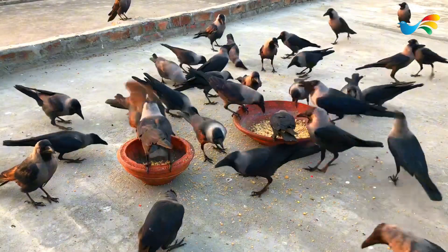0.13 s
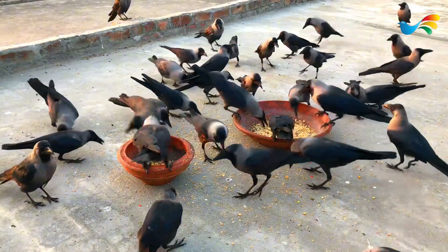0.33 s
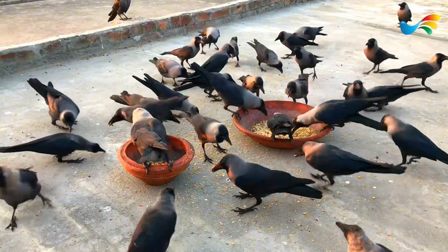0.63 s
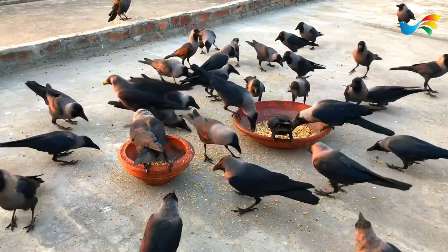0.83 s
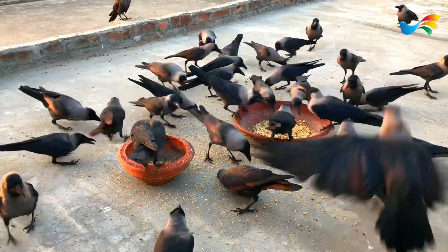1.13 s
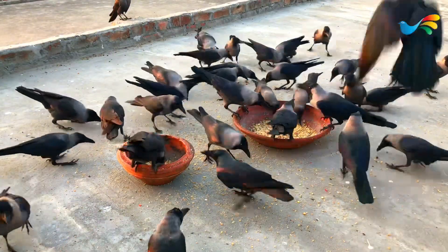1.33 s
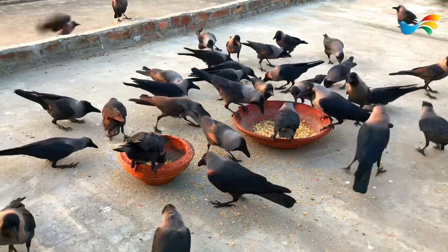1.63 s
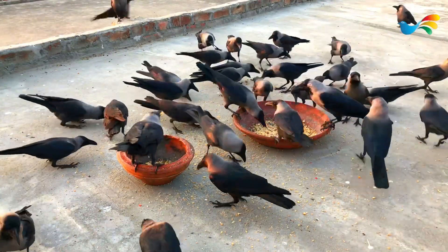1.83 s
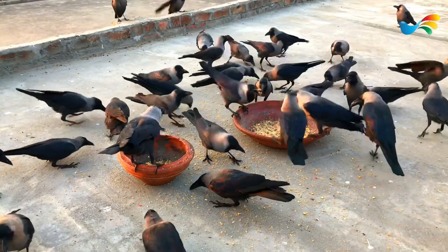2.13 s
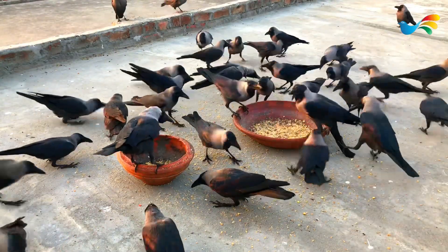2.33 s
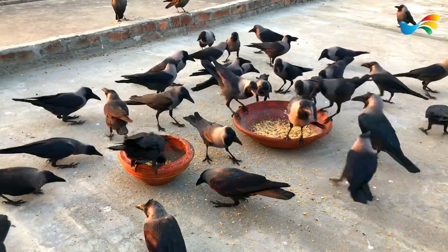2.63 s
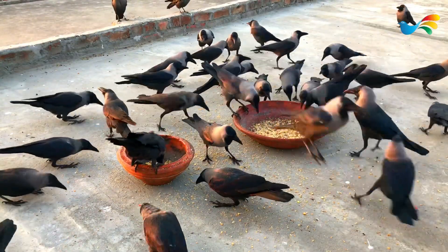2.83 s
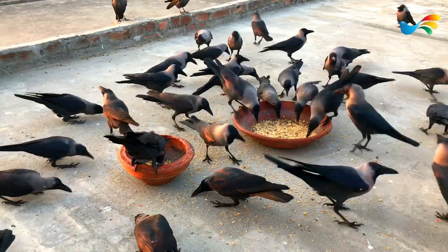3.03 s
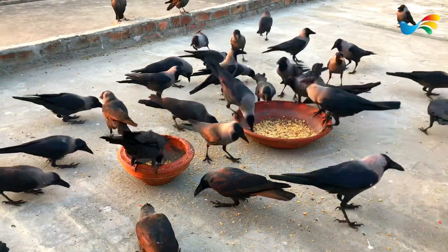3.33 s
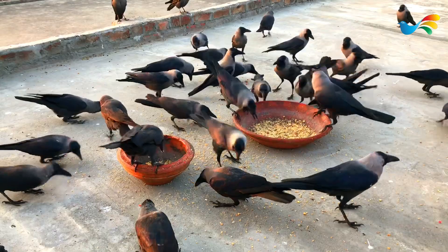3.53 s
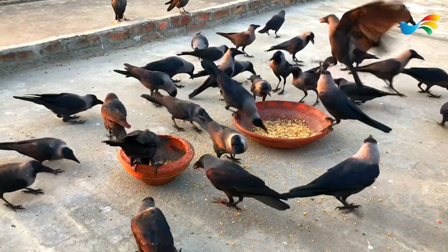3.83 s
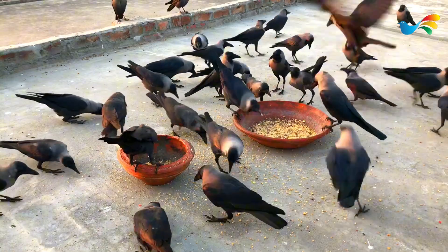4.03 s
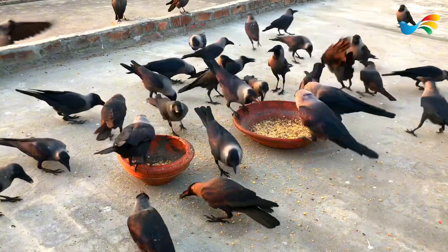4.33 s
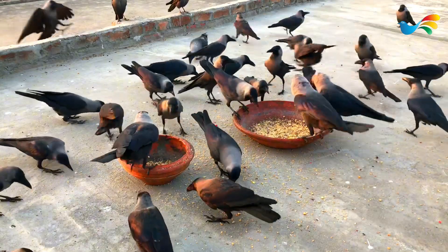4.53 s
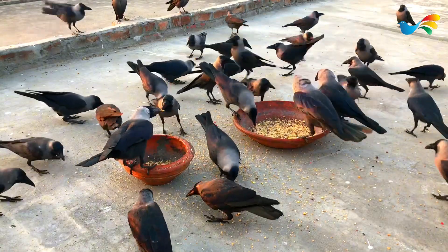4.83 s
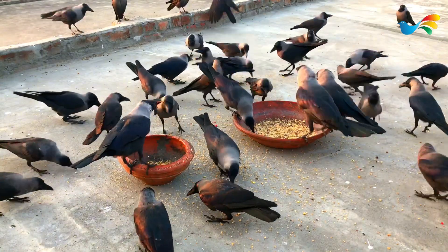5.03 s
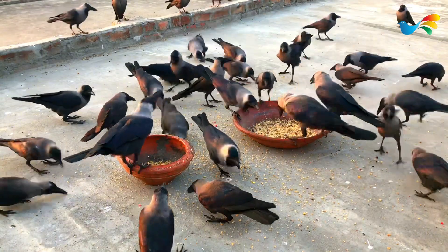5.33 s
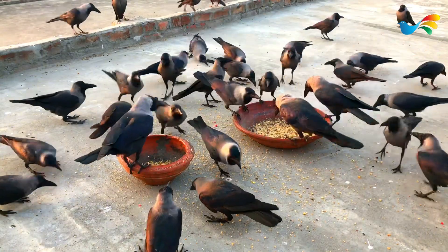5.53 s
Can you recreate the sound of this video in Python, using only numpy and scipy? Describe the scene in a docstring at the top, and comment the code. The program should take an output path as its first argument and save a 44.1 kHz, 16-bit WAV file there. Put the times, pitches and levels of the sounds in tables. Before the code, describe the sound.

Hoarse, fluttering crow caws come from several birds near the microphone, some loud and some faint, on a rooftop with little echo. They are sparse at first, with soft wing beats, then crowd together after a burst of pecking on clay and concrete. Feet land with dull knocks, and a deeper croak comes last. A low town rumble and a fine patter of tiny taps continue underneath.

```python
"""Crows squabbling on a roof

A flock of crows caws around clay food bowls on an open concrete roof. Each caw is a stack
of harmonics (whole multiples of one pitch), shaken by a slower flutter and shaped by the
throat and beak. Birds thump down, beaks and claws tick, wings swish, and the town
rumbles far below."""
import sys
import numpy as np
from scipy import signal
from scipy.fft import rfft, irfft
from scipy.io import wavfile
from scipy.ndimage import uniform_filter1d

SR = 44100
rng = np.random.default_rng(int(sys.argv[2]) if len(sys.argv) > 2 else 0)


def generate_wav(signal):
    """Clip the signal to [-1, 1] and save it as 16-bit WAV at the path in sys.argv[1]."""
    frames = np.transpose(np.atleast_2d(signal))
    scaled = np.clip(frames, -1, 1) * 32767
    pcm = np.round(scaled).astype(np.int16)
    wavfile.write(sys.argv[1], SR, pcm)


N = 250047

# The tone of the town, from bass to treble: (frequency [Hz], level [dB])
TOWN_TONE = [(20, -27), (75, -7.5), (479, -14), (888, -20.5), (3620, -23), (4530, -29), (14700, -31),
             (16500, -24)]
# Slow rises and dips of the background: (time [s], rustle level [dB], rumble level [dB])
BACKGROUND_LEVELS = [(0, -1, 0.5), (.8, 3, 2.5), (1.25, 1, 2), (1.45, -2.5, 0.5), (2.75, -1.5, 0.5),
                     (3.8, 1.5, -0.5), (4.4, 1.5, 3.5), (4.85, -1, 2.5), (5.67, 1.5, 1.5)]
# Feet landing on bowls and floor: (time [s], level [dB], pitch [Hz], time to fade by 60 dB [s])
LANDINGS = [(.113, -28.5, 461, 0.21), (0.442, -27.5, 145, 0.052), (2.295, -26, 296, 0.063),
            (2.843, -22.5, 560, 0.04), (3.402, -20, 425, 0.09), (3.435, -26, 534, 0.12),
            (3.717, -18.5, 181, 0.047)]
# Beaks and claws on clay and concrete:
# (time [s], level [dB], centre frequency [Hz], time for the tail to fade by 60 dB [s])
BEAK_AND_CLAW_HITS = [(.2154, -24, 9000, .006), (.413, -30, 14500, .04), (1.1677, -25, 3300, .02),
                      (1.1997, -23, 4500, .02), (1.3159, -24, 9000, .04), (1.6462, -26, 3000, .02),
                      (2.3406, -22, 6000, .09), (2.3755, -25, 2400, .03), (2.4733, -26, 13000, .015),
                      (2.5072, -22, 5000, .12), (2.541, -28, 1900, .015), (2.5653, -21, 8000, .08),
                      (2.6209, -23, 2500, .03), (2.7272, -22, 12000, .008), (4.4478, -30, 8000, .06)]
# One caw, or one part of a caw, a row, in five groups:
# voice (flutter rate [Hz], pitch swing [fraction], loudness throb [0-1], roughness [0-1])
# breath (start [s], length [s], fade-in [s], fade-out [s], effort [dB], drift over the length [dB])
# tune (main pitch [Hz], start below it [fraction], final fall [fraction],
#       optional change of the odd harmonics in the fade-out [dB])
# beak (resonance [Hz], glide over the length [fraction], width [Hz])
# throat (windpipe resonance [Hz], windpipe level [dB], ring level [dB], hiss level [dB],
#         optional hiss frequency [Hz])
CAW_PARTS = [ ((42, .04, .6, .45), (.222, .2, .035, .06, -35, -9), (376, .07, .07), (3040, .08, 900),
             (729, 9, -26, -30.5)), ((80, .008, 0, .22), (.611, .146, .012, .135, -14.5, -3),
             (302, .01, .34, -60), (1820, .12, 1250), (590, -5, -30, -25, 9000)), ((82, .055, .3, .17),
             (1.69, .22, .09, .13, -18.5, -1.5), (512, .06, .08), (1680, .01, 1150), (900, -19, -20, -22)),
             ((84, .04, .25, .37), (1.83, .25, .06, .2, -19.5, -10), (475, -.02, .4), (1950, -.1, 1500),
             (986, -22, -19, -20.5)), ((71, .035, .2, .39), (2.04, .145, .05, .04, -30, 5), (440, -.03, .1),
             (2550, -.05, 950), (1236, -9, -13, -21.5)), ((71, .035, .25, .39),
             (2.15, .15, .05, .08, -21.5, -12), (370, -.04, .15), (2100, -.2, 1000), (1000, -11, -16, -24)),
             ((87, .08, .3, .21), (2.835, .345, .13, .07, -25, 3), (440, .3, .5), (2030, -.02, 560),
             (980, -14, -25, -28, 7300)), ((80, .005, 0, .3), (3.17, .22, .012, .025, -45.5, -14),
             (545, 0, 0), (1630, 0, 400), (1101, -22, -30, -31.5)), ((78, .065, .3, .22),
             (3.38, .235, .09, .07, -17.5, -5), (500, .07, .04), (2020, -.02, 620), (950, -17, -20, -28)),
             ((75, .04, .3, .35), (3.565, .145, .03, .09, -23.5, -5), (445, -.03, .1), (1950, 0, 750),
             (950, -12, -21, -28)), ((80, .05, .3, .5), (3.7, .28, .03, .025, -41, 1.5), (519, .015, 0),
             (2000, .05, 600), (1050, -2.2, -20, -21.5)), ((75, .05, .2, .33),
             (3.95, .28, .04, .12, -23, 3.5), (474, .09, .3), (1600, .3, 850), (1151, -7.5, -23, -33)),
             ((70, .02, .2, .4), (4.27, .24, .18, .06, -30, .3), (570, .03, .04), (2000, -.08, 800),
             (1194, -17, -22, -26)), ((67, .045, .2, .42), (4.43, .31, .08, .2, -24.5, -1.5),
             (462, .03, .18), (1970, -.06, 800), (1193, -12, -26, -30)), ((75, .04, .2, .38),
             (4.93, .24, .07, .045, -40.5, .2), (500, .04, .06), (1950, 0, 892), (980, -11.5, -23, -27.5)),
             ((72.5, .055, .35, .17), (5.1, .305, .09, .21, -19.5, -6), (592, .36, .4), (1950, .15, 800),
             (1270, 8.5, -8, -20, 6700)), ((75, .03, .6, .5), (5.415, .07, .02, .04, -21, -3),
             (500, .02, .05), (1530, -.05, 500), (900, -9, -35, -50)), ((64.5, .005, .2, .3),
             (5.428, .178, .07, .06, -16, -2), (139, .08, .01), (720, .19, 230), (1400, -16, -48, -61)),
             ((64.5, .01, .2, .34), (5.588, .075, .025, .05, -24, -3), (175, 0, .2), (760, -.35, 380),
             (1400, -9, -48, -61)), ]
# Soft puffs of air: wing beats, and a breathy hiss just before the close caw:
# (time of the middle [s], level [dB], length [s])
AIR_PUFFS = [(0.451, -42, 0.047), (0.604, -41, 0.025), (0.936, -44.5, 0.11), (1.048, -36.5, 0.045),
             (1.158, -38, 0.037), (2.35, -45.5, 0.14)]
# The tone of the rushing air: (frequency [Hz], level [dB])
AIR_TONE = [(120, -40), (200, 0), (2380, -2.5), (3250, -0.5), (4770, -17), (7270, -6), (16000, -16.5)]
# How the microphone lifts or lowers the sound: (frequency [Hz], gain [dB])
MIC_TONE = [(3800, 1), (5000, -4), (7200, 3.5), (9500, -2.5)]


def gain_of(db):
    """Turns decibels into a number to multiply a sound by."""
    return 10 ** (np.asarray(db) / 20)


def unit_level(x):
    """Scales a signal so that its average power is 1."""
    return x / np.sqrt(np.mean(abs(x) ** 2) + 1e-20)


def level_at(tone, hz):
    """Looks up a level in dB, joining a table's points along a scale of octaves."""
    f, db = np.transpose(tone)
    return np.interp(np.log(hz + 1), np.log(f + 1), db)


def coloured(x, db_at):
    """Turns each frequency of x up or down by db_at(frequency) decibels."""
    return irfft(rfft(x) * gain_of(db_at(np.fft.rfftfreq(len(x), 1 / SR))), len(x))


def add(mix, start, sound):
    """Mixes a sound in at a start time in seconds."""
    part = mix[round(start * SR):][:len(sound)]
    part += sound[:len(part)]


def wander(shape, span):
    """A smooth random wobble that changes over about span samples."""
    *rows, size = np.atleast_1d(shape)
    step = max(span // 3, 1)
    coarse = rng.standard_normal((*rows, size // step + 1))
    steps = np.repeat(coarse, step, -1)[..., :size]
    return unit_level(uniform_filter1d(steps, span))


def resonance(f, hz, width_hz, db):
    """How strongly a hollow space passes the frequencies f: best at hz, much less to either side."""
    return gain_of(db) / (1 + (2 * (f - hz) / width_hz) ** 2) ** 2


def town(rustle_db, rumble_db, level_db=-46.8):
    """Far traffic blurs into a low rumble and a higher rustle, both drifting in patches."""
    frames = N // 128 + 5  # the noise is built in short slices, 128 samples apart
    hz = np.fft.rfftfreq(512, 1 / SR)
    real, imaginary, patches = rng.standard_normal((frames, len(hz), 3)).T
    patches = uniform_filter1d(patches, 4, axis=0)
    patches = unit_level(uniform_filter1d(patches, 14, axis=1))
    above_bass = np.clip(np.log2(hz / 150 + 1e-9) / 2.5, 0, 1)[:, None]
    rustle, rumble = (np.pad(db[::128], (0, 5), "edge")[:frames] for db in (rustle_db, rumble_db))
    flicker_db = 2.46 * wander(frames, 4)
    swell_db = 2.2 * patches + above_bass * (rustle + flicker_db) + (1.5 - above_bass) * rumble
    slices = (real + 1j * imaginary) * gain_of(swell_db)
    noise = signal.istft(slices, nperseg=512, noverlap=384)[1][:N]
    noise /= np.median(abs(noise))
    tone = unit_level(gain_of(level_at(TOWN_TONE, np.fft.rfftfreq(N, 1 / SR))))
    return gain_of(level_db) * irfft(rfft(noise) * tone, N)


def patter(taps_per_s=130, level_db=-55.5):
    """Many tiny pecks and claw taps, a few of them louder; each is a very short, high ping."""
    out, t = np.zeros(N), np.arange(300) / SR
    strength = gain_of(4.5 * np.minimum(rng.exponential(1, N), 3.5))
    hits = strength * (rng.random(N) < taps_per_s / SR)
    pitch_choice = rng.integers(0, 12, N)
    for choice, hz in enumerate(np.geomspace(8000, 16000, num=12)):
        ping = np.sin(2 * np.pi * hz * t) * np.exp(-t * hz / 1.6)
        out += signal.oaconvolve(hits * (pitch_choice == choice), ping)[:N]
    return gain_of(level_db) * unit_level(out)


def landing_thumps(rise_s=.0089):
    """Feet give a bowl or the floor a soft push, and it rings with one dull, unsteady note."""
    out, t = np.zeros(N), np.arange(8000) / SR
    for start, db, hz, fade_s in LANDINGS:
        pitch = hz * (1 + .05 * wander(len(t), 100))
        ring = np.sin(2 * np.pi * np.cumsum(pitch) / SR) * (1 + .4 * wander(len(t), 40))
        loudness = gain_of(db - 60 * t / fade_s) * (1 - np.exp(-t / rise_s))
        add(out, start, loudness * ring)
    return out


def beak_and_claw_ticks(click_s=.004):
    """A beak or claw hits something hard: a sharp click with a short, scratchy tail."""
    out, t = np.zeros(N), np.arange(3000) / SR
    lead = 40  # samples of room, because filtering spreads the click both ways
    for start, db, hz, tail_s in BEAK_AND_CLAW_HITS:
        fade = gain_of(-60 * t / click_s) + .55 * gain_of(-60 * t / tail_s)
        burst = np.roll(rng.standard_normal(len(t)) * fade, lead)
        burst = coloured(burst, lambda f: -6.5 * np.log2((f + 1) / hz) ** 2)
        add(out, start - lead / SR, gain_of(db) * burst / abs(burst).max())
    return out


def throat_gains(f, ending, pipe_hz, pipe_db, ring_db, hiss_db, hiss_hz=7000):
    """The throat has three resonances; the lowest, the windpipe's, weakens in the fade-out."""
    windpipe = resonance(f, pipe_hz, width_hz=810, db=pipe_db - 7 * ending ** 2)
    ring = resonance(f, hz=3700, width_hz=1050, db=ring_db)
    hiss = resonance(f, hiss_hz, width_hz=6400, db=hiss_db)
    return windpipe + ring + hiss


def rough_harmonics(number, pitch, roughness):
    """A rough voice smears each harmonic from a clean tone into noise, the high ones first."""
    blur = np.clip(2 * roughness ** 2 * (1.3 + (number * pitch / 4200) ** 2), 0, 1)
    phase = number * 2 * np.pi * np.cumsum(pitch) / SR + .45 * number ** 2
    wobble_a, wobble_b = wander((2, *phase.shape), 70) / np.sqrt(2)
    noisy = wobble_a * np.cos(phase) + wobble_b * np.sin(phase)
    return np.sqrt(1 - blur ** 2) * np.cos(phase) + blur * noisy


def caw(voice, breath, tune, beak, throat):
    """A caw or part of one: the voice flutters, and the throat and beak shape its tone."""
    flutter_hz, swing, throb, roughness = voice
    start, length, fade_in, fade_out, level_db, drift_db = breath
    main_hz, scoop, fall, odd_db = (*tune, 0)[:4]
    beak_hz, glide, beak_width_hz = beak
    t = np.arange(0, length, 1 / SR)
    opening = np.clip(1 - t / fade_in, 0, 1)  # goes from 1 to 0
    ending = np.clip(1 - (length - t) / fade_out, 0, 1)  # goes from 0 to 1
    effort_db = level_db - 20.5 * opening ** 2 + drift_db * t / length - 22 * ending ** 3.8
    roughness = roughness + .012 * (effort_db.max() - effort_db)  # weak effort is hoarser

    # The pitch slides to its main note, flutters, and may droop at the end.
    slide = scoop * np.clip(1 - t / (length - fade_out), 0, 1) ** 3
    droop = 1 - fall * ending ** 2.8
    pitch = main_hz * (droop - slide)
    number = np.arange(1, 13000 // pitch.max() + 1)[:50, None]  # one row for each harmonic
    flutter_rate = flutter_hz * (1 + .4 * roughness * wander(len(t), 500))
    flutter_phase = 2 * np.pi * np.cumsum(flutter_rate) / SR
    flutter = np.sin(flutter_phase) + .3 * np.sin(2 * flutter_phase)
    pitch *= 1 + swing * flutter + .024 * roughness * wander(len(t), 200)

    # The throat and beak decide how strong each harmonic is.
    harmonic_hz = number * pitch
    beak_hz = beak_hz * (1 + glide * t / length) * droop ** .35  # partly follows the droop
    gains = throat_gains(harmonic_hz, ending, *throat)
    gains += resonance(harmonic_hz, beak_hz, beak_width_hz, db=0)
    gains[::2] *= gain_of(odd_db * ending ** 2)
    gains *= gain_of(2 * wander(gains.shape, 880))  # each harmonic swells and sinks on its own
    gains[0] *= gain_of(-16)  # the lowest harmonic carries poorly into the air
    sound = (gains * rough_harmonics(number, pitch, roughness)).sum(0)

    # The loudness throbs unevenly, in time with the flutter.
    throb = throb * (1 - ending) * (1 + 2 * roughness * wander(len(t), 700))
    sound *= 1 + throb * np.cos(flutter_phase + .85)
    power = uniform_filter1d((gains ** 2).sum(0) / 2, 500) * (1 + throb ** 2 / 2)
    sound *= gain_of(effort_db) / np.sqrt(power)
    return start, sound * signal.windows.tukey(len(t), .08)


def air_puffs():
    """Wing beats and one breathy hiss: lumpy puffs of air that swell and fade."""
    t = np.arange(N) / SR
    swell = sum(gain_of(db) * np.exp(-(2 * (t - middle) / length) ** 2)
                for middle, db, length in AIR_PUFFS)
    air = unit_level(coloured(rng.standard_normal(N), lambda f: level_at(AIR_TONE, f)))
    lumps = gain_of(1.12 * wander(N, 80))
    return swell * air * lumps


def roof_echoes(sound, echo_db=-18, fade_s=.5):
    """Adds a thin scatter of echoes from the concrete floor and the walls around it."""
    echoes = np.zeros(SR // 2)
    slots = np.arange(200, len(echoes) - 20, 20)
    delays = slots + rng.integers(0, 20, len(slots))
    echoes[delays] = rng.choice([-1., 1.], len(slots)) * gain_of(-60 * slots / SR / fade_s)
    echoes /= np.linalg.norm(echoes)
    return sound + gain_of(echo_db) * signal.fftconvolve(sound, echoes)[:N]


def scene():
    """Mixes the town with the crows' feet, beaks, voices and puffs of air in one channel."""
    times, *levels = np.transpose(BACKGROUND_LEVELS)
    rustle_db, rumble_db = (np.interp(np.arange(N) / SR, times, db) for db in levels)
    background = town(rustle_db, rumble_db) + gain_of(rustle_db) * patter()
    crows = landing_thumps() + beak_and_claw_ticks()
    for part in CAW_PARTS:
        add(crows, *caw(*part))
    return (background + roof_echoes(crows) + air_puffs())[None]


def record(dry):
    """A small microphone behind a hole gives the treble a dip and a peak; the very top is cut off."""
    heard = coloured(dry[0], lambda f: level_at(MIC_TONE, f))
    low_pass = signal.firwin(511, cutoff=15900, window=("kaiser", 9), fs=SR)
    return signal.oaconvolve(heard, low_pass, "same")[None]


dry = scene()
out = record(dry)
generate_wav(out)
```